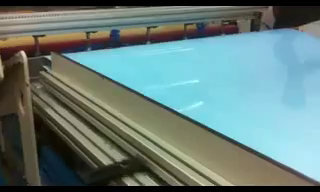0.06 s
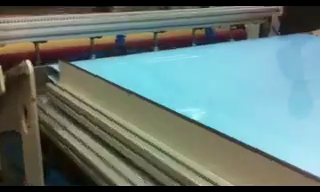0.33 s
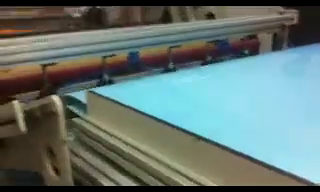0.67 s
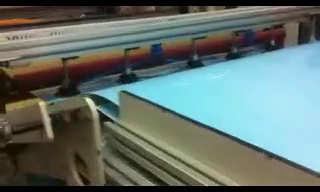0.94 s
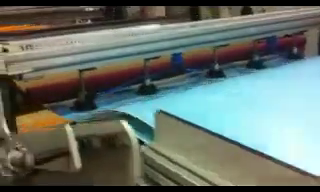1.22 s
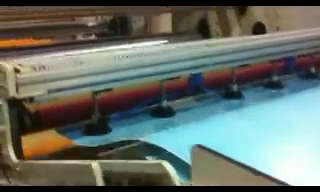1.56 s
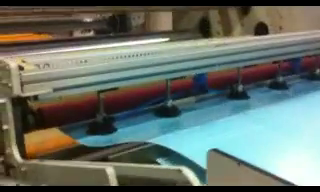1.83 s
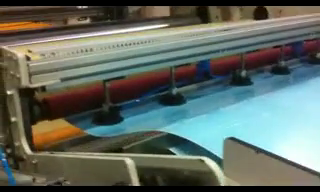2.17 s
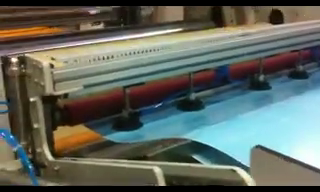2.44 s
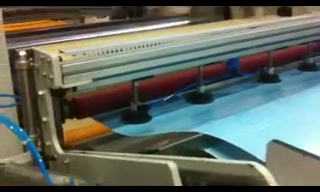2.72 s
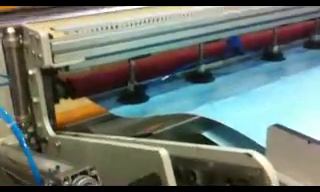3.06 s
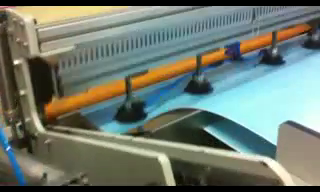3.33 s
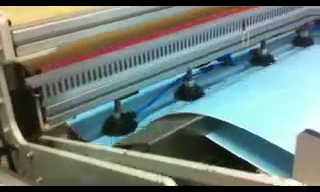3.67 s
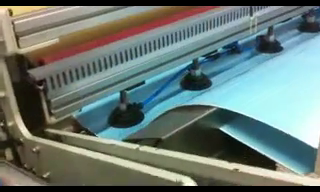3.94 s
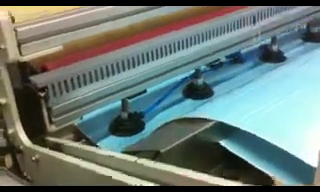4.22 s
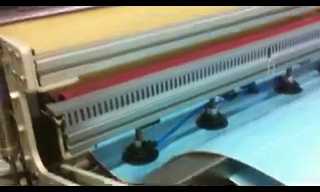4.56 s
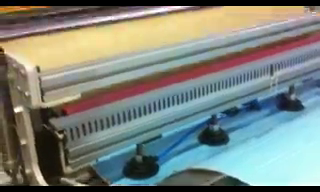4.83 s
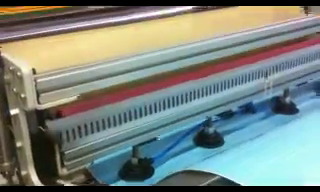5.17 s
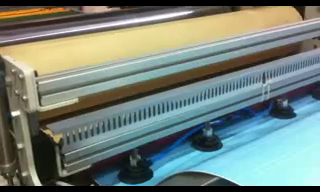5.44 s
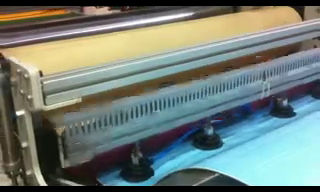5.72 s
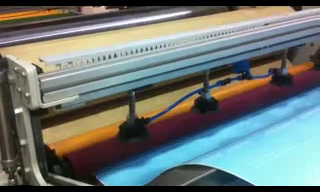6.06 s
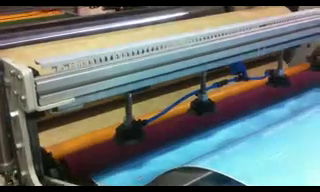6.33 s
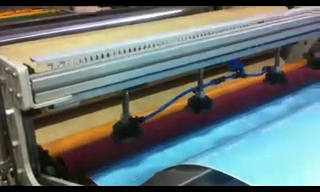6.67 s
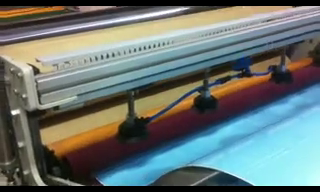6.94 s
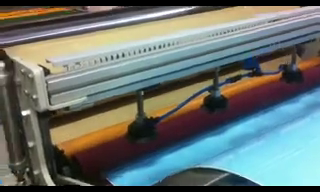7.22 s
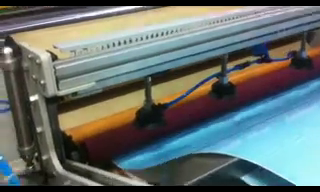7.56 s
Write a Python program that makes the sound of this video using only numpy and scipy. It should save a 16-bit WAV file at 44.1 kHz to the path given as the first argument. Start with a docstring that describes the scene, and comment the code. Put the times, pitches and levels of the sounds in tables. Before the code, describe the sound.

Loud suction hiss, short air puffs and metal clunks from a sheet-feeding machine, leaving rumbling drives and rushing rollers in a hall.

```python
"""A sheet laminator runs one feed cycle in a factory hall, heard in mono from beside the feed table. Air hisses
at the suction cups, sizzling harder as the microphone comes round to them and the line refills, until a valve
shuts it off. Valves vent in short falling puffs, the suction bar lands on its stops with a clunk, the linkage
clacks. Behind it the drives rumble and the rollers rush; the loudest hits briefly push the gain down."""
import sys
import numpy as np
from scipy import signal
from scipy.fft import rfft, irfft, next_fast_len
from scipy.io import wavfile
from scipy.ndimage import uniform_filter1d

SR = 44100
rng = np.random.default_rng(int(sys.argv[2]) if len(sys.argv) > 2 else 0)


def digitize_waveform(pressure):
    """Quantize a signal to 16-bit integers and store it at the path in sys.argv[1].

    Rows of a 2-D input are taken as channels; values are limited to [-1, 1].
    """
    field = np.atleast_2d(pressure).T
    bounded = np.clip(field, -1, 1)
    quanta = np.round(bounded * 32767).astype(np.int16)
    wavfile.write(sys.argv[1], SR, quanta)


N = 343980


def suction(shut_s=5.25, closing_s=0.12, flutter_db=0.6, hall_db=-7):
    """A broad leak, a nozzle jet and the sizzle of the cup edges, all fed by one valve."""
    # colour of the leak: frequency_hz, density_db
    leak_spectrum = [(60, -33), (300, -24), (800, -14.5), (1050, -7.5), (1300, -2), (1650, 0.5), (2050, -1),
                     (2450, 1), (2900, -4), (3250, -9.5), (4500, -9), (5600, -8), (7500, -8.5), (8000, -11)]
    # resonances of the nozzles: pitch_hz, width_hz, level_db
    nozzle_resonances = [(3240, 770, -12), (3690, 740, 0), (4050, 330, 0.5), (4514, 240, 1),
                         (4660, 230, -3.5), (5000, 330, -9.5)]
    # resonances of the cup edges: pitch_hz, width_hz, level_db
    edge_resonances = [(5460, 230, -6), (6330, 100, 0), (7000, 520, -0.5), (7570, 640, -15),
                       (7690, 620, -9), (7380, 250, -18)]
    leak_db, jet_db, edge_db = air_line()
    shade = 1 - ramp(0.68, 1.76)  # the side guide shades the treble until the microphone rounds it
    leak = from_db(leak_db) * noise(leak_spectrum)
    jet = from_db(jet_db - 8 * shade) * resonant_noise(nozzle_resonances)
    sizzle = from_db(edge_db - 4 * shade) * resonant_noise(edge_resonances)
    valve = np.exp(-np.maximum(clock() - shut_s, 0) / closing_s)
    air = frame_reflections(leak + jet + sizzle) * valve * from_db(flutter_db * drift(41))
    return air + from_db(hall_db) * hall(air)


def air_line(sag_db=7, refill_s=1.85, opening_sag_db=1.5):
    """Leak, jet and sizzle levels in dB: each stroke of the bar drains the line, which then refills."""
    # strokes of the suction bar, with levels at full pressure: start_s, leak_db, jet_db, sizzle_db
    strokes = [(0.223, -20.5, -22, -34.5), (3.229, -22, -19.5, -23)]
    levels = np.outer(strokes[0][1:], np.ones(N)) - opening_sag_db
    for start, *full_db in strokes:
        age = clock() - start
        sag = sag_db * np.exp(-np.maximum(age, 0) / refill_s)
        levels = np.where(age >= 0, np.array(full_db)[:, None] - sag, levels)
    return levels


def valve_puffs(lowest_hz=2200, linger_db=-16, knock_hall_db=-9, whistle_hall_db=-1):
    """The spool knocks, then air rushes out with a hoarse band that falls with the pressure."""
    # valves venting: start_s, rush_db, rush_decay_s, chirp_db, chirp_decay_s, pitch_fall_s, port_hz,
    # whistle_db, whistle_decay_s, knock_db, hall_db
    vents = [(.224, -10.5, 0.073, -16, 0.059, 0.041, 4520, -12.5, 0.026, -7.5, 0.5),
             (3.229, -7, 0.039, -7.5, 0.03, 0.09, 4314, -14.5, 0.03, -12, -1.5),
             (5.249, -3.5, 0.035, -9, 0.028, 0.08, 3290, -11, 0.019, -2, -0.5),
             (5.752, -9.5, 0.12, -6.5, 0.059, 0.125, 5560, -1, 0.013, -4.5, -1.5),
             (6.859, -52, 0.085, -42.5, 0.21, .13, 5690, -52, 0.16, -58, 4)]
    # rush of vented air: frequency_hz, density_db
    rush_spectrum = [(200, -32), (900, -1), (1600, -6), (2500, -0.5), (3600, -1.5), (5400, 3), (6800, 3),
                     (8000, -4.5)]
    # the spool hitting its end stop: frequency_hz, density_db
    knock_spectrum = [(30, -63), (70, -35.5), (140, -26), (280, -3.5), (550, -18), (880, -1), (1050, 0.5),
                      (1350, -15.5), (2000, -15.5), (5000, -14)]
    rush, knock = noise(rush_spectrum), noise(knock_spectrum)
    direct, to_hall = 0, 0
    for (start, rush_db, rush_s, chirp_db, chirp_s, fall_s, port_hz,
         whistle_db, whistle_s, knock_db, hall_db) in vents:
        fall = np.exp(-np.maximum(clock() - start, 0) / fall_s)
        pitch = np.maximum(1.09 * port_hz * fall, lowest_hz)
        pressure = burst(start, 0.0013, chirp_s) + from_db(linger_db) * burst(start, chirp_s, fall_s)
        puff = from_db(chirp_db) * pressure * swept_noise(pitch, half_width_hz=650)
        puff += from_db(rush_db) * burst(start, 0.0035, rush_s) * rush
        whistle = from_db(whistle_db) * port_whistle(start, port_hz, fall_s, whistle_s, lowest_hz)
        thud = from_db(knock_db) * burst(start - 0.004, 0.0012, 0.012) * knock
        direct += puff + whistle + thud
        to_hall += from_db(hall_db) * (puff + from_db(whistle_hall_db) * whistle)
        to_hall += from_db(knock_hall_db) * thud
    return direct + hall(to_hall)


def port_whistle(start, port_hz, fall_s, decay_s, lowest_hz, flutter_hz=109.2):
    """A puff's falling band sets the port's resonances whistling, highest first."""
    # resonances of a valve port: pitch_ratio, level_db
    port_resonances = [(1.6, -11), (0.97, 2), (0.785, -6.5), (0.445, -8.5)]
    whistle = 0
    for ratio, db in port_resonances:
        onset = start + fall_s * max(-np.log(ratio), 0)
        reached = ratio * port_hz > lowest_hz
        pitch = ratio * port_hz + flutter_hz * drift(160)
        tone = np.sqrt(2) * np.cos(2 * np.pi * np.cumsum(pitch) / SR)
        whistle += reached * from_db(db) * burst(onset, 0.0022, decay_s) * tone
    return whistle


def bar_clunks(modes_db=-15, scatter_db=3.8, hall_db=-2):
    """Each landing of the suction bar shakes the panels and sets the frame ringing."""
    # the bar landing on its stops: start_s, level_db, decay_s
    landings = [(0.391, -25, 0.08), (3.649, -31, 0.071), (5.428, -22, 0.033), (5.44, -6.5, 0.02),
                (5.465, -8.5, 0.053), (5.544, -33, 0.048), (5.878, -21, 0.069)]
    # modes of the frame: pitch_hz, relative_db, t60_s
    frame_modes = [(179, -1, 0.11), (216, 21.5, 0.08), (281, -11, 0.078), (411.5, 8.5, 0.39),
                   (560, -11, .14), (690, -9.5, .18), (840, -2, .16), (1110, -13.5, .12),
                   (1830, -18.5, .14)]
    # dense ringing of the panels: frequency_hz, density_db
    panel_spectrum = [(40, -41), (90, -33.5), (150, 5.5), (400, -2), (750, -1.5), (1090, -2.5), (1350, -12),
                      (1950, -10), (3000, -18.5), (8000, -37)]
    envelope = sum(from_db(db) * burst(start, 0.002, decay) for start, db, decay in landings)
    shake = envelope * noise(panel_spectrum)
    onsets = [round(start * SR) for start, _, _ in landings]
    scatter = rng.normal(0, scatter_db, (len(landings), len(frame_modes)))
    strength = from_db(np.array(landings)[:, 1:2] + scatter)
    for k, (hz, level_db, t60) in enumerate(frame_modes):
        blows = np.zeros(N)
        blows[onsets] = strength[:, k] * from_db(level_db + modes_db) * (-1) ** k
        r, w = np.exp(-np.log(1000) / (t60 * SR)), 2 * np.pi * hz / SR
        shake += signal.lfilter([0, np.sin(w)], [1, -2 * r * np.cos(w), r * r], blows + 1e-18)
    return shake + from_db(hall_db) * hall(shake)


def linkage_clacks(hall_db=-3):
    """Lighter contacts of linkage and sheet: a mid-range rattle with a short metallic edge."""
    # linkage and sheet clacking: start_s, level_db, decay_s, relative_edge_db
    contacts = [(3.259, -26, 0.2, -24), (5.44, -17.5, 0.059, -4), (5.919, -14.5, 0.05, -22),
                (6.087, -15, 0.02, -3), (6.11, -18, 0.027, -26), (6.141, -10, 0.0059, -11.5),
                (6.166, -25, 0.033, -23), (6.875, -31, 0.1, -10)]
    # dull rattle of the linkage: frequency_hz, density_db
    rattle_spectrum = [(60, -28.5), (200, -12), (700, 1.5), (1250, 0.5), (1800, 3.5), (2300, 4),
                       (3000, -4.5), (5000, -8.5), (8000, -35)]
    rattle = noise(rattle_spectrum)
    edge = resonant_noise([(3870, 1900, -2), (5170, 600, 0), (6600, 2000, -1)])
    clacks = sum(from_db(db) * burst(start, 0.0004, decay) * (rattle + from_db(edge_db) * edge)
                 for start, db, decay, edge_db in contacts)
    return clacks + from_db(hall_db) * hall(clacks)


def drives(swell_db=1.6, period_s=2.9, crest_s=2.48, throb_db=0.97, fade_db_per_s=0.59):
    """Drive rumble and roller rush swell slowly together, under a hum and a few thin whines."""
    # rumble of the drives: frequency_hz, density_db
    rumble_spectrum = [(25, -34.5), (55, -36.5), (85, -21), (120, -13), (155, -5), (205, -5), (250, -1.5),
                       (305, -2.5), (350, -4.5), (410, -4.5), (490, -8.5), (750, -17), (1300, -25),
                       (3000, -41)]
    # rush of the rollers: frequency_hz, density_db
    roller_spectrum = [(60, -29), (300, -10), (700, 6), (1250, 7), (1700, 5), (2400, 3), (2950, 0.5),
                       (4000, -0.5), (4600, -1.5), (5000, -5.5), (6400, -9), (8000, -8)]
    # narrow whines of the drives: pitch_hz, width_hz, level_db
    whine_bands = [(205.3, 8.7, -42), (409.6, 35, -46.5), (817, 22, -59), (1257, 29, -51.5),
                   (3780, 40, -53.5), (4050, 30, -50), (4350, 30, -64), (7050, 30, -70.5)]
    swell = swell_db * np.cos(2 * np.pi * (clock() - crest_s) / period_s)
    rumble = from_db(-29.5 + swell + throb_db * drift(3.3)) * noise(rumble_spectrum)
    bar_raised = ramp(2.2, 2.28) - ramp(3.25, 3.33)
    hum = from_db(-44 + 10.5 * bar_raised) * narrow_noise(308, 14)
    # the rollers fade as the microphone moves on
    rollers = from_db(-32 - fade_db_per_s * clock() + swell) * noise(roller_spectrum)
    whines = sum(from_db(db) * narrow_noise(hz, width / 2) for hz, width, db in whine_bands)
    late_swell = np.exp(-((clock() - 7.65) / 0.32) ** 2)
    top_whistle = from_db(-55 + 10.5 * late_swell) * narrow_noise(7970, 35)
    return rumble + hum + rollers + whines + top_whistle


def frame_reflections(x, echo_db=-16, sway=0.0723, count=4):
    """Short reflections off the nearby steel comb the sound, and shift as the microphone moves."""
    combed = x.copy()
    for lag_s in rng.uniform(0.001005, 0.005, count):
        delay = lag_s * (1 + sway * drift(0.28))
        combed += from_db(echo_db) * np.interp(clock() - delay, clock(), x)
    return combed * np.std(x) / np.std(combed)


def hall(x, build_s=0.0017):
    """Diffuse echo of the factory hall; the mid-range rings longest."""
    # reverberation of the hall: frequency_hz, t60_s
    decay_times = [(100, 0.48), (700, 1), (2000, 0.76), (4000, 0.83), (8000, 0.59)]
    age = np.arange(int(1.5 * SR)) / SR
    octaves = np.geomspace(40, 10240, 9)
    echo = 0
    for low, high in zip(octaves, octaves[1:]):
        band = filtered(rng.standard_normal(len(age)), 2, [low, high], "band")
        t60 = at_hz(decay_times, np.sqrt(low * high))
        fade = from_db(-60 * age / t60) * (1 - np.exp(-age / build_s))
        echo += band * fade / np.sqrt(np.sum(fade ** 2))
    return signal.fftconvolve(x, echo)[:N]


def automatic_gain(x, threshold_db=-15, share=0.7, attack_s=0.011, release_db_per_s=16.5):
    """Loud moments at the microphone turn the gain down quickly; it creeps back up."""
    power = uniform_filter1d(x[0] ** 2, size=660)
    level_db = 10 * np.log10(np.maximum(power, 1e-12))
    cut_db = share * np.maximum(level_db - threshold_db, 0)
    recovered = release_db_per_s * clock()
    held = np.maximum.accumulate(cut_db + recovered) - recovered
    r = np.exp(-1 / (attack_s * SR))
    return x * from_db(-signal.lfilter([1 - r], [1, -r], held))


def noise(spectrum):
    """Steady noise of a given colour, rms 1."""
    size = next_fast_len(N)
    gain = from_db(at_hz(spectrum, np.fft.rfftfreq(size, 1 / SR)))
    return rms_one(irfft(rfft(rng.standard_normal(size)) * gain, size)[:N])


def resonant_noise(resonances):
    """Turbulence exciting a set of resonances, rms 1."""
    ringing = 0
    for hz, width_hz, level_db in resonances:
        r = np.exp(-np.pi * width_hz / SR)
        poles = [1, -2 * r * np.cos(2 * np.pi * hz / SR), r * r]
        band = signal.lfilter([1, 0, -1], poles, rng.standard_normal(N))
        ringing += from_db(level_db) * (1 - r * r) * band
    return rms_one(ringing)


def swept_noise(hz, half_width_hz):
    """A broad band of turbulence centred on a moving pitch, rms 1."""
    turbulence = filtered(rng.standard_normal((2, N)), 1, half_width_hz)
    turbulence = filtered(turbulence, 2, 2 * half_width_hz)
    phase = 2 * np.pi * np.cumsum(hz) / SR
    return rms_one(turbulence[0] * np.cos(phase) + turbulence[1] * np.sin(phase))


def narrow_noise(hz, half_width_hz):
    """A breathy tone on a steady pitch, rms 1."""
    phase = 2 * np.pi * hz * clock()
    return drift(half_width_hz) * np.cos(phase) + drift(half_width_hz) * np.sin(phase)


def drift(rate_hz, step=40):
    """Smooth random wander of spread 1."""
    r = np.exp(-2 * np.pi * rate_hz * step / SR)
    slow = signal.lfilter([1], [1, -2 * r, r * r], rng.standard_normal(N // step + 2002))[2000:]
    return np.interp(np.arange(N) / step, np.arange(len(slow)), rms_one(slow))


def burst(start_s, rise_s, decay_s):
    """Envelope that rises and dies away."""
    first, envelope = round(start_s * SR), np.zeros(N)
    age = np.arange(min(int(10 * decay_s * SR), N - first)) / SR
    envelope[first:first + len(age)] = (1 - np.exp(-age / rise_s)) * np.exp(-age / decay_s)
    return envelope


def ramp(start_s, end_s):
    """Rises from 0 to 1 between two moments."""
    return np.clip((clock() - start_s) / (end_s - start_s), 0, 1)


def filtered(x, order, hz, kind="low"):
    """Low-, high- or band-pass with a flat passband."""
    return signal.sosfilt(signal.butter(order, hz, kind, fs=SR, output="sos"), x)


def at_hz(points, hz):
    """Read a table on a log-frequency axis."""
    frequencies, values = np.transpose(points)
    return np.interp(np.log(np.maximum(hz, 1)), np.log(frequencies), values)


def from_db(db):
    """Decibels to gain."""
    return 10 ** (np.asarray(db) / 20)


def rms_one(x):
    """Scale to unit rms."""
    return x / np.sqrt(np.mean(x ** 2) + 1e-20)


def clock():
    """Time of every sample in seconds."""
    return np.arange(N) / SR


def scene():
    """The whole machine, from one microphone beside the feed table."""
    return (suction() + drives() + valve_puffs() + bar_clunks() + linkage_clacks())[None]


def record(dry, low_cut_hz=50, makeup_db=0.31, ceiling=0.8, top_hz=8040):
    """The microphone chain: bass cut, automatic gain, rounded peaks and a steep treble cut."""
    thin = filtered(dry, 1, low_cut_hz, "high")
    levelled = from_db(makeup_db) * automatic_gain(thin)
    rounded = levelled / (1 + (levelled / ceiling) ** 4) ** 0.25
    return signal.sosfilt(signal.ellip(14, 0.1, 90, top_hz, fs=SR, output="sos"), rounded)


dry = scene()
out = record(dry)
digitize_waveform(out)
```